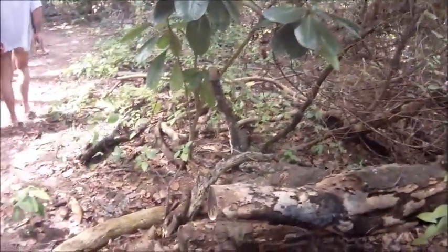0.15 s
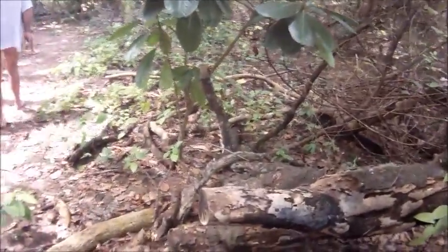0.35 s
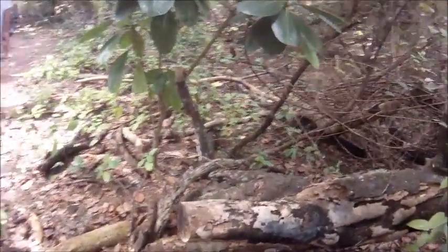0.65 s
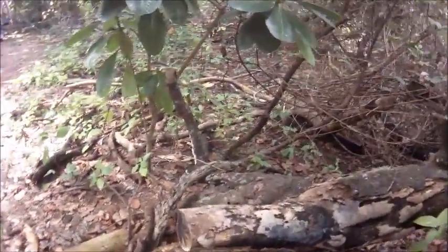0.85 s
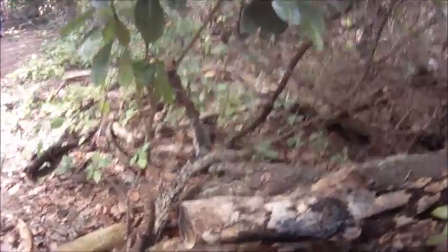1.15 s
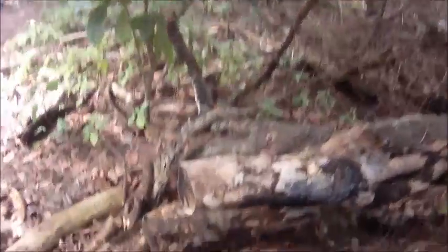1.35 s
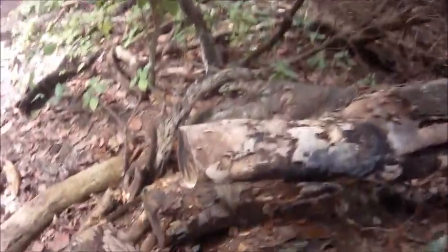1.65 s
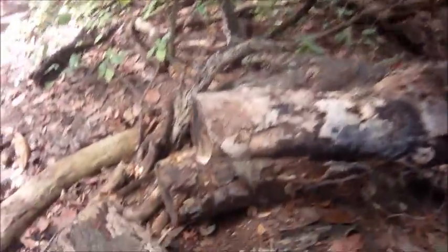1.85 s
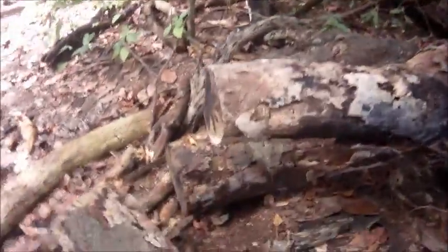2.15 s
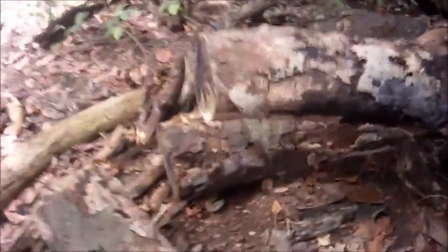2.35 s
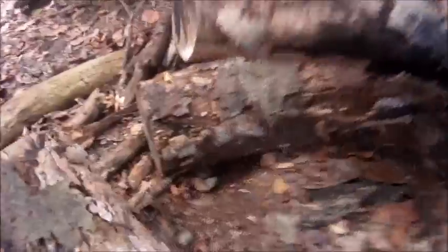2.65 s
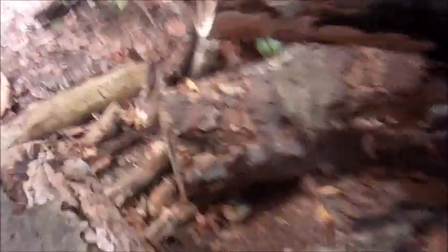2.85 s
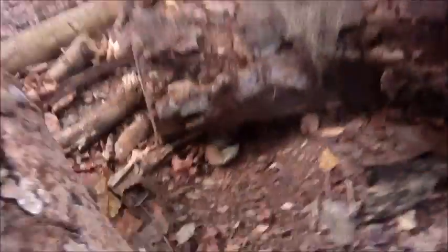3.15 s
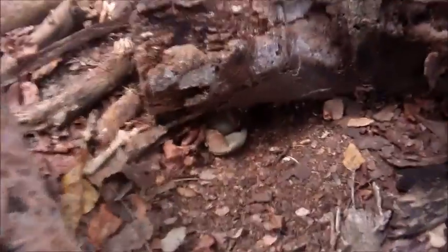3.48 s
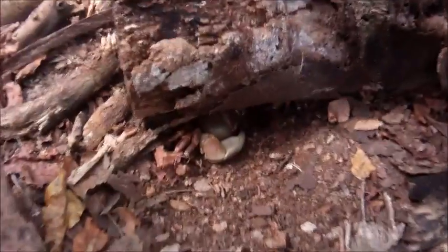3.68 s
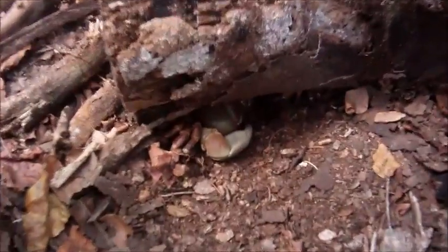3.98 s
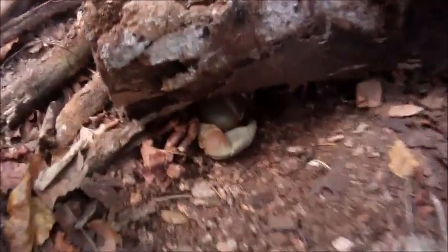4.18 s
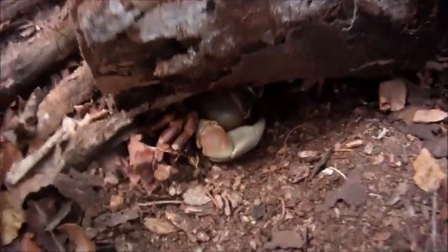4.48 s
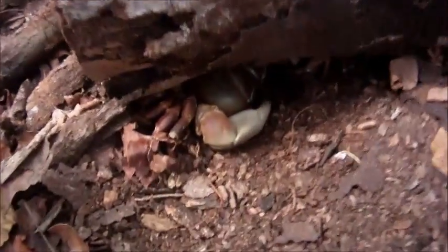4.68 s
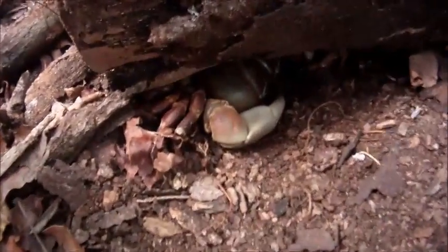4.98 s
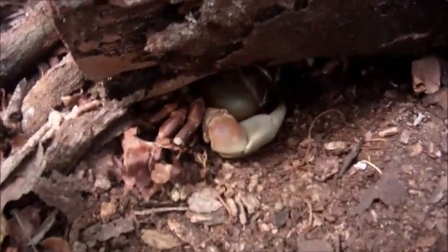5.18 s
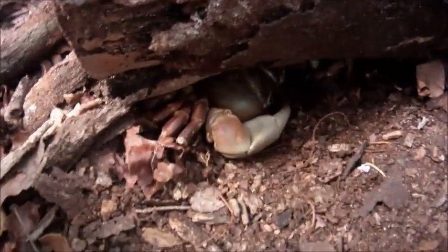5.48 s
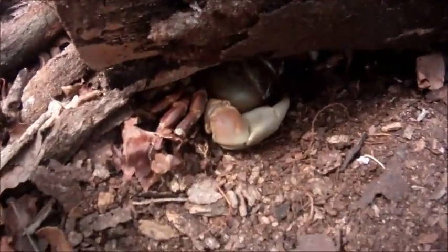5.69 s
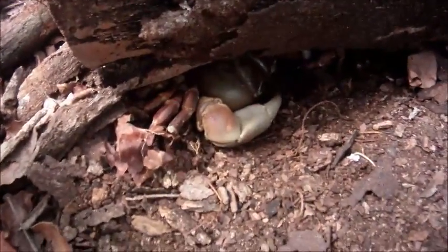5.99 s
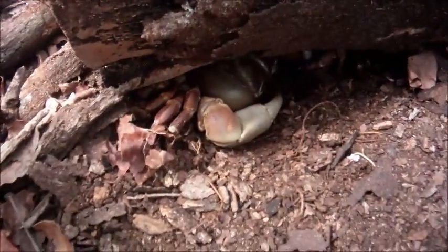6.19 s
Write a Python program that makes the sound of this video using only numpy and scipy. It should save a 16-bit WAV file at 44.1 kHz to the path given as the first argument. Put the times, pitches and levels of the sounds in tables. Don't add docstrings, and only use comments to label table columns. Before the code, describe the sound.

A quiet forest floor with faint hiss, thin electronic whine and two soft distant bird notes. Dry leaves rustle while a hand rubs and bumps the camera. Twig ticks thicken into crunching and scraping, then two violent snaps overload the microphone just after three seconds. After a lull, sticks clatter lightly, a stiff leaf creases in rapid clicks, and a few hollow taps fade into hiss. Close, dry, practically mono.

```python
import sys
import numpy as np
from scipy import signal
from scipy.fft import rfft, irfft
from scipy.io import wavfile
from scipy.ndimage import uniform_filter1d

SR = 44100
rng = np.random.default_rng(int(sys.argv[2]) if len(sys.argv) > 2 else 0)


def to_wav(sig):
    pcm = np.clip(np.atleast_2d(sig), -1, 1) * 32767
    pcm = np.round(pcm).astype(np.int16)
    wavfile.write(sys.argv[1], SR, pcm.T)


def gain_from_db(level_db):
    decades = np.asarray(level_db, float) / 20
    return 10 ** decades


N = 279153


def level(x, rms_db):
    return x * gain_from_db(rms_db) / np.sqrt(np.mean(x ** 2))


def peak(x, peak_db):
    return x * gain_from_db(peak_db) / np.abs(x).max()


def band(x, lo_hz, hi_hz, order=2):
    sos = signal.butter(order, [lo_hz, min(hi_hz, .47 * SR)], "band", fs=SR, output="sos")
    return signal.sosfilt(sos, x)


def ring(x, hz, t60_s):
    pole = np.exp(2j * np.pi * hz / SR - np.log(1000) / (t60_s * SR))
    return signal.lfilter([1], [1, -pole], x).imag


def ring_modes(x, modes):
    return sum(gain_from_db(gain_db) * ring(x, hz, t60_s) for hz, gain_db, t60_s in modes)


def add(out, sound, start_s):
    i = int(start_s * SR)
    out[i:i + len(sound)] += sound[:N - i]


def walk(rate_hz):
    hold = int(SR / rate_hz)
    steps = np.repeat(rng.standard_normal(N // 500), hold)[:N]
    slow = uniform_filter1d(uniform_filter1d(steps, hold), hold)
    return slow / slow.std()


def swells(rows):
    t = np.arange(0, N / SR, .001)
    loudest_s, swell_s, fade_s, level_db = np.transpose(rows)[:, :, None]
    drop = np.maximum((loudest_s - t) / np.abs(swell_s), (t - loudest_s) / np.abs(fade_s))
    power = gain_from_db(2 * (level_db - 20 * drop)).sum(axis=0)
    return np.interp(np.arange(N) / SR, t, np.sqrt(power))


def burst(noise, decay_ms, click):
    rattle = noise * np.exp(-np.arange(len(noise)) / SR / (decay_ms / 1000))
    return np.concatenate([[-click], rattle[1:]])


def grains(per_s, spread_db, tail_ms):
    struck = rng.random(N) < per_s / SR
    cracks = struck * gain_from_db(spread_db * np.minimum(rng.exponential(size=N), 4.5))
    tail = signal.lfilter([1], [1, -np.exp(-1000 / (tail_ms * SR))], cracks)
    return tail * rng.standard_normal(N)


# (frequency [Hz], density [dB/Hz])
HISS_SPECTRUM = [(71, -41.5), (120, -8), (839, -7.5), (1050, -7.5), (2240, -10.5), (3450, -4),
                 (4410, -12.5), (5080, -4), (5630, -11.5), (8140, -2), (9020, -15), (14700, -11.5),
                 (16000, -31)]


def forest_hiss():
    hz, density_db = np.transpose(HISS_SPECTRUM)
    bins_hz = np.fft.rfftfreq(N, 1 / SR)
    shape = gain_from_db(np.interp(np.log(bins_hz + 1), np.log(hz), density_db))
    hiss = irfft(rfft(rng.standard_normal(N)) * shape, N)
    return level(hiss, -67) * gain_from_db(0.77 * walk(7.5))


# (frequency [Hz], rms level [dB])
WHINE_LINES = [(3494, -95), (5156, -78.5), (5184, -75.5), (8360, -76)]


def electronics():
    t = np.arange(N) / SR
    whine = 0
    for hz, rms_db in WHINE_LINES:
        gain = gain_from_db(rms_db + 1 + 1.2 * walk(25))
        whine = whine + gain * np.sin(2 * np.pi * hz * t + .3 * walk(28))
    frame_hz = 60
    spikes = np.zeros(N)
    for rate_hz, height in [(2 * frame_hz, 1), (frame_hz, 0.45)]:
        spikes[(np.arange(int(t[-1] * rate_hz)) * SR / rate_hz).astype(int)] = height
    spikes = spikes * gain_from_db(2 * rng.standard_normal(N))
    buzz = ring(spikes, 7780, t60_s=0.0092) + .5 * ring(spikes, 5100, t60_s=0.0034)
    return whine + level(band(buzz, 6000, 8500, order=3), -74) * gain_from_db(2.2 * walk(11))


# (loudest [s], swell [s/20 dB], fade [s/20 dB], level [dB])
BIRD_NOTES = [
    (.36, .15, 0.3054, -93.5),
    (.49, 0.18, 0.083, -76.5),
    (.7, 0.256, 0.124, -76.5),
]


def bird():
    hz = 2104 * (1 + 0.01193 * walk(12))
    return np.sqrt(2) * swells(BIRD_NOTES) * np.sin(2 * np.pi * np.cumsum(hz) / SR)


# (time [s], shake level [dB], grip level rel. shake [dB])
HAND_MOTION = [(0.0, -74.5, 3), (.7, -71, 2), (.85, -67.5, 7), (1.1, -70, 12), (1.2, -71, -7.5),
               (1.55, -69.5, -1.5), (1.65, -62, 3), (1.85, -63.5, 2.5), (1.95, -61.5, -27.5),
               (2.9, -61.5, -18.5), (3.12, -57, 2), (3.24, -61, -8.5), (3.52, -65.5, -20.5),
               (4.99, -61.5, -32.5), (6.33, -73.5, 2.7)]


def hand():
    time_s, shake_db, grip_db = np.transpose(HAND_MOTION)
    t = np.arange(N) / SR
    shake = level(band(rng.standard_normal(N), 2.9, 29), 0)
    grip = level(band(grains(61, 3.0, tail_ms=7.2), 34, 110), 0)
    grip = gain_from_db(np.interp(t, time_s, grip_db) - 10.5) * grip
    return gain_from_db(np.interp(t, time_s, shake_db)) * (shake + grip)


# (time [s], peak [dB], contact [ms], direction [+-1])
HOUSING_BUMPS = [(.589, -50, 0.7007, -1), (0.658, -52.5, 0.98, 1), (.805, -50.5, 15.4, 1),
                 (0.829, -46, 0.456, -1), (0.887, -50.5, 11.7, -1), (1.565, -59.5, 4.7, -1),
                 (1.61, -52.5, 1.23, -1), (1.627, -53, 1.85, 1), (1.633, -54.5, 11.6, 1),
                 (1.889, -55.5, 7.3, -1), (2.19, -46, 1.75, 1), (2.5473, -35.5, 2.52, -1),
                 (3.123, -33, 6, -1), (3.339, -24.5, 15.65, 1)]


def bumps():
    out = np.zeros(N)
    t_ms = np.arange(3000) / SR * 1000
    for start_s, peak_db, contact_ms, direction in HOUSING_BUMPS:
        push = np.sin(np.pi * np.clip(t_ms / contact_ms, 0, 1)) ** 2
        rough = 1 + 0.96 * rng.standard_normal(len(push))
        add(out, peak(band(np.sign(direction) * push * rough, 42, 630, order=1), peak_db), start_s)
    return out


# (loudest [s], swell [s/20 dB], fade [s/20 dB], level [dB], pitch [Hz])
HOUSING_DRAGS = [(.96, 0.96, -0.06, -74, 1054), (1.251, -0.8, -0.53, -76, 3376),
                 (1.84, 0.06, 0.08, -66, 1199), (2.12, .1, .1, -62, 1150), (2.179, 0.1, 0.03, -57, 1600),
                 (2.316, 0.0649, 0.07, -49, 665), (2.34, 0.0821, 0.0454, -49, 666),
                 (2.336, 0.19, 0.2461, -60, 269.4), (2.808, 0.03, 0.04, -55, 1250),
                 (2.87, 0.06, 0.05, -53, 1250), (2.907, 0.05, 0.025, -43, 1239),
                 (2.97, 0.05, 0.08, -51, 1180), (3.045, 0.02, 0.08, -41, 1204),
                 (3.097, 0.0512, 0.02, -33, 1700), (3.056, 0.1729, 0.15, -52, 302),
                 (3.089, 0.0319, 0.0462, -34.5, 1165), (3.106, 0.0378, -0.0016, -23.5, 1164),
                 (3.225, 0.59, 0.0845, -58.5, 1659), (3.35, 0.24, -0.0351, -60, 1053),
                 (4.189, 0.47, 1.5, -70.5, 1098), (4.291, 0.012, 0.025, -52, 1900),
                 (4.306, .008, .025, -54, 1200), (4.328, 0.02, 0.06, -57, 900),
                 (4.403, 0.01, 0.04, -60, 1000), (4.359, 0.03, 0.04, -55, 1200),
                 (4.567, 0.1829, 0.2, -57, 805)]


def drags():
    slips = level(grains(1000, 2.7, tail_ms=1.5), 0) * gain_from_db(2.4 * walk(35))
    scrape = level(band(slips, 390, 3100), 0) * swells(np.array(HOUSING_DRAGS)[:, :4])
    tone = 0
    for *movement, hz in HOUSING_DRAGS:
        part = band(ring(slips, hz, t60_s=6 / hz), hz / 1.2, hz * 1.2)
        tone = tone + level(part, 0) * swells([movement])
    return gain_from_db(-4) * (scrape + gain_from_db(-2) * tone)


# (loudest [s], swell [s/20 dB], fade [s/20 dB], level [dB], low modes rel. [dB])
PALM_RUBS = [(1.974, .008, .04, -51, -8), (2.013, .02, .03, -56, -12), (2.028, .008, .04, -53, -12),
             (2.054, .01, .05, -50, -12), (2.078, .015, .03, -49, -10), (2.115, .02, .08, -49, -10),
             (2.132, .02, .05, -50, -10), (2.153, .015, .06, -46, -10), (2.164, .02, .04, -47, -8),
             (2.178, .03, .012, -48, -6), (2.63, .15, .15, -56, -12), (2.894, .012, .04, -38, 0),
             (2.905, .02, .03, -38, 0), (2.916, .03, .008, -39, -2), (3.041, .008, .04, -31, -3),
             (3.056, .02, .03, -31, 2), (3.076, .015, .04, -30, -4), (3.089, .005, .06, -25, 1),
             (3.105, .05, .012, -25, 1)]
# (frequency [Hz], gain [dB], t60 [s])
RUB_HIGH_MODES = [(4130, -5, .012), (5050, -12, .007), (6750, 0, .011), (7080, -3, .01)]
# (frequency [Hz], gain [dB], t60 [s])
RUB_LOW_MODES = [(1183, -2.5, 0.0202), (1590, -9, 0.0161), (2590, 0.5, 0.0158), (3317, -1, 0.018)]


def rubs():
    rows = np.array(PALM_RUBS)
    high_db = rows[:, 3]
    low_db = high_db + rows[:, 4]
    slips = level(grains(900, 3.0, tail_ms=.6), 0)
    out = 0
    for modes, level_db, lo_hz in [(RUB_HIGH_MODES, high_db, 3000), (RUB_LOW_MODES, low_db, 800)]:
        gain = swells(np.c_[rows[:, :3], level_db])
        norm = np.std(ring_modes(slips[:SR], modes))
        out = out + band(ring_modes(slips * gain, modes), lo_hz, 9000) / norm
    return out


# (time [s], drive [dB], tearing [ms], shell rel. [dB], treble rel. [dB])
HEAVY_SNAPS = [
    (3.1181, -11.5, 5.7, 2, -3),
    (3.1235, 5, 0.669, -7, -12),
    (3.1300, -11, 1.5, -11, -29.5),
    (3.3397, 13.5, 3.0, 0.5, -4.5),
    (3.353, -36.5, 2.35, -6.5, 0.5),
]
# (frequency [Hz], gain [dB], t60 [s])
HOUSING_MODES = [(306, -19, 0.016), (681.5, -13, 0.019), (1062.8, -7.5, 0.024), (1284, -4, 0.015),
                 (1515.9, -7.5, 0.012), (1888.6, -11.5, 0.012), (2090, -11, 0.016)]
# (frequency [Hz], gain [dB], t60 [s])
SHELL_MODES = [(2600, -9, .008), (2950, -6, .007), (3260, -1, .009), (3930, -3, .006), (5490, -7, .005),
               (6500, -6, .004), (7580, -11, .004)]


def snaps():
    out, hollow = np.zeros(N), np.zeros(N)
    t_ms = np.arange(6000) / SR * 1000
    for start_s, drive_db, tearing_ms, shell_db, treble_db in HEAVY_SNAPS:
        noise = rng.standard_normal(6000)
        push = np.r_[-np.full(4, 2.5), noise[4:]] * np.exp(-(t_ms / tearing_ms) ** 3)
        body = peak(ring_modes(push, HOUSING_MODES), 0)
        shell = peak(ring_modes(push, SHELL_MODES), shell_db)
        treble = peak(band(push, 4200, 9400, order=1), treble_db)
        add(out, peak(body + shell + treble, drive_db), start_s)
        log_answer = ring(push, 570, t60_s=0.16)
        debris = band(burst(noise[::-1], decay_ms=5, click=0), 1500, 14000, order=1)
        add(hollow, peak(log_answer, drive_db - 57), start_s)
        add(hollow, peak(debris, drive_db - 48), start_s)
    flat = np.tanh(out / 0.89) * 1.7
    flat = signal.lfilter(*signal.iirnotch(770, 1.6, fs=SR), flat)
    sagged = signal.lfilter(*signal.butter(1, 900, "high", fs=SR), band(flat, 260, 22000))
    return sagged + hollow


# (time [s], peak [dB], pitch [Hz])
BRITTLE_TICKS = [(0.6037, -44, 7440), (0.6976, -45, 6760), (.7733, -43.5, 6550), (1.1026, -48, 7100),
                 (1.468, -56, 7000), (1.9395, -52, 6740), (1.973, -40.5, 6570), (1.9794, -48.5, 6800),
                 (2.0264, -53, 6925), (2.0785, -37, 6800), (2.1626, -41, 6900), (2.239, -44, 2560),
                 (2.3601, -34, 8520), (2.3744, -35.5, 4922), (2.3919, -38, 6230), (2.4252, -38, 5038),
                 (2.432, -32, 6710), (2.4715, -45, 3312), (2.4786, -35.5, 5930), (2.8071, -32, 6800),
                 (2.8542, -34.5, 7020), (2.8788, -23.5, 5150), (2.9416, -39, 4747), (2.985, -36, 6520),
                 (2.8922, -28, 6500), (2.9055, -26, 6600), (2.9165, -31.5, 7230), (3.0395, -21, 2600),
                 (3.043, -24, 5270), (3.057, -23, 2500), (3.5109, -45.5, 6700), (3.553, -48.5, 7020),
                 (3.625, -46.5, 7620), (4.2105, -45.5, 3670), (4.374, -45.5, 6522), (4.439, -36, 5010)]
# (time [s], crack peak [dB], pitch [Hz], knock rel. [dB])
TWIG_KNOCKS = [(0.5913, -51, 3920, -8), (0.8288, -41, 6640, -8.5), (1.6287, -61.5, 5140, 6),
               (1.6793, -42, 5150, -14), (1.8425, -42.5, 5159, -8.5), (2.1908, -32, 5200, -6),
               (2.271, -42, 4452, -1), (2.2753, -37.5, 3370, 7.5), (2.28, -40, 5016, 0.5),
               (2.285, -54, 3000, -6), (2.3533, -35, 5070, -21), (2.3129, -41, 3390, -1.5),
               (2.3407, -28.5, 4990, -10), (2.409, -44, 4834, -18.5), (2.5472, -28.5, 4800, -5),
               (2.5514, -31.5, 7286, -5), (2.6826, -48, 6566, 0), (2.9454, -27.5, 6130, -11),
               (3.0871, -8.5, 2578, -4.5), (3.2133, -42.5, 2000, -3), (4.1888, -43.5, 4945, -11),
               (4.273, -57.5, 2508, 3), (4.2782, -47, 6440, -0.5), (4.2851, -24.5, 5960, -11),
                (4.2888, -34, 2066, -15.5), (4.3014, -28, 6670, -5.5), (4.3152, -42.5, 6771, 2),
                (4.3242, -49.5, 2070, 9.5), (4.3321, -50.5, 3003, 6.5), (4.337, -60.5, 2494, 3),
                (4.35, -51.5, 6500, 2), (4.366, -62.5, 2199, 5.5), (4.385, -54, 3900, -2.5),
                (4.3533, -39, 5036, -1), (4.3581, -45.5, 3900, 6.5), (4.3981, -43, 3347, 5),
                (4.4481, -46.5, 7698, -2), (4.5115, -42.5, 5074, -12.5), (4.5411, -49, 2319, 2.5),
                (4.553, -35, 6190, -3), (4.5639, -48, 5990, 9), (4.5681, -39.5, 6672, -1.5),
                (4.572, -45.5, 4510, -12.5), (4.5864, -46.5, 2018, -6.5), (4.6, -41, 4677, -4.5),
                (4.6101, -54, 6474, -8.5), (4.625, -44.5, 4600, -13), (4.6725, -41.5, 2159, 2.5),
                (4.6879, -46, 2363, 0.5), (4.753, -31, 5074, -8.5)]
# (time [s], crack peak [dB], pitch [Hz], knock rel. [dB])
STICK_TAPS = [(4.9376, -47.5, 4931, -1.5), (4.9839, -36.5, 2102, -1), (5.0415, -48.5, 3483, -13),
              (5.0513, -42.5, 7400, 4), (5.1572, -37.5, 6135, 1.42), (5.262, -43, 6550, 0.5),
              (5.3822, -34.5, 6666, -4), (5.413, -34, 6743, -7.5), (5.4361, -47, 2090, 1.5)]
# (frequency [Hz], gain [dB], t60 [s])
KNOCK_MODES = [(326.8, -8.5, 0.061), (559.85, -32.5, 0.0153), (762.59, -3, 0.02618), (1188, 9, 0.0072),
               (1544, 3.5, 0.0086)]
# (frequency [Hz], gain [dB], t60 [s])
HOLLOW_MODES = [(332.1, -11.5, 0.0404), (629, -40, 0.0206), (829.6, 2, 0.032), (1139, 2, 0.0168),
                (1294.3, -3.5, 0.01185), (1522, -1.5, 0.0137), (1974.9, -6, 0.0135)]


def ticks():
    out = np.zeros(N)
    breaks = [(*row, -22, -25, KNOCK_MODES) for row in BRITTLE_TICKS]
    breaks += [(*row, -29, KNOCK_MODES) for row in TWIG_KNOCKS]
    breaks += [(*row, -29, HOLLOW_MODES) for row in STICK_TAPS]
    for start_s, peak_db, pitch_hz, knock_db, top_db, modes in breaks:
        crack_noise, push_noise, gain_noise, pitch_noise = rng.standard_normal((4, 1800))
        crack = burst(crack_noise, decay_ms=1.2, click=2.2)
        bright = peak(band(crack, 1973, 7940, order=5), -1.2)
        bright = bright + peak(band(ring(crack, pitch_hz, t60_s=0.00717), 2100, 11000), -5)
        push = burst(push_noise, decay_ms=0.616, click=3.92)
        varied = [(hz * (1 + 0.02206 * d), gain_db + 1.8 * c, t60_s)
                  for (hz, gain_db, t60_s), c, d in zip(modes, gain_noise, pitch_noise)]
        knock = band(ring_modes(push, varied), 310.4, 3400, order=3)
        top = band(burst(crack_noise, decay_ms=.5, click=3), 7500, 18030)
        add(out, peak(bright, peak_db), start_s)
        add(out, peak(knock, peak_db + knock_db), start_s)
        add(out, peak(top, peak_db + top_db), start_s)
    return out


# (time [s], peak [dB], top rel. [dB])
LEAF_CREASES = [(4.6482, -30.5, -9), (4.6634, -35, -11), (4.7148, -33, -8), (4.725, -36.5, -14.5),
                (4.727, -36.5, -13), (4.748, -39, -6.5), (4.7652, -31, -12.5), (4.78, -40, -16.5),
                (4.7832, -39, -21.5), (4.7943, -31, -8), (4.8167, -30.5, -7), (4.8267, -31.5, -12.5),
                (4.8315, -37.5, -17.5), (4.841, -34.5, -23.5), (4.859, -35, -15.5), (4.8736, -37, -13),
                (4.9105, -29, -6.5), (4.924, -38.5, -16), (4.9286, -43.5, -20), (4.9389, -34.5, -10),
                (4.9606, -48.5, -19), (4.9729, -35.5, -13.5)]
# (frequency [Hz], gain [dB], t60 [s])
BLADE_MODES = [(2690, -4.5, 0.0056), (3900, -5, 0.0066), (4890, 0.5, 0.00677), (6007, -10, 0.0108)]
# (frequency [Hz], gain [dB], t60 [s])
BLADE_TOP_MODES = [(8550, 7.5, 0.00258), (11900, -6.5, 0.0032), (15040, -19, 0.002694)]


def creases():
    out = np.zeros(N)
    for start_s, peak_db, top_db in LEAF_CREASES:
        push_noise, mode_noise = rng.standard_normal((2, 900))
        push = burst(push_noise, decay_ms=0.55, click=10.04)
        varied = [(hz * (1 + 0.0298 * d), gain_db + 2.95 * c, t60_s)
                  for (hz, gain_db, t60_s), c, d in zip(BLADE_MODES, mode_noise, mode_noise[::-1])]
        blade = band(ring_modes(push, varied) + gain_from_db(6.5) * push, 2413, 6120, order=3)
        top = band(ring_modes(push, BLADE_TOP_MODES), 8100, 18240)
        add(out, peak(blade, peak_db + 0.5), start_s)
        add(out, peak(top, peak_db + top_db + 5.5), start_s)
    return out


# (loudest [s], swell [s/20 dB], fade [s/20 dB], level [dB], leaf size [0-1])
SQUASHED_LEAVES = [(2.316, 0.0112, 0.062, -45.5, 0.95), (2.806, 0.071, 0.101, -42.5, 0.174),
                   (2.88, 0.0044, 0.0175, -31.5, 0.36), (2.895, 0.037, 0.0244, -33.5, 0.49),
                   (2.856, 0.0065, 0.083, -41.5, 0.27), (2.947, 0.00693, 0.11, -40.5, .6),
                   (2.989, 0.086, 0.133, -38.5, 0.606)]
# (loudest [s], swell [s/20 dB], fade [s/20 dB], level [dB], leaf size [0-1])
BRUSHED_LEAVES = [(.46, 0.5558, 0.29, -58.5, 0.56), (.75, 0.5, 0.5, -66, 0.67),
                  (1.21, 0.1153, 0.4146, -61, 0.66), (1.8, 0.55, 0.48, -60.5, 0.67),
                  (1.976, 0.1069, -0.07, -59.5, 0), (2.078, 0.2648, 0.48, -55.5, 0.28),
                  (2.118, -0.0022, 0.21, -54, 0.42), (2.225, -0.17, 0.09, -60.5, 0.75),
                  (2.268, 0.0142, -0.1436, -48.5, 0.62), (2.4, 0.13, 0.37, -59, 0.98),
                  (2.54, 0.3, -0.73, -53, 0.49), (2.63, 0.17, 0.51, -53.5, 0.34),
                  (3.03, -0.02, 0.0409, -33, 0.49), (3.042, -0.0191, 0.0151, -33, 0.49),
                  (3.058, -0.0277, -0.0043, -28.5, 0.96), (3.076, 0.0007, -0.0049, -27, 0.63),
                  (3.09, -0.0122, 0.0054, -24.5, 1), (3.225, -1.07, 0.3235, -58, 0.7),
                  (3.87, 0.4, 0.22, -62.5, 0.38), (4.3, 0.7056, 0.6, -63, 0.57),
                  (4.57, 0.2428, -0.03, -63, 0.46), (4.62, 0.06, 0.12, -59, 0.7),
                  (4.68, 0.0723, 0.036, -57, 1), (4.75, 0.45, 0.25, -58, 0.68),
                  (4.85, -0.44, 0.38, -67, 0.84)]
# (stop [s], swell [s/20 dB], level [dB], leaf size [0-1])
HALTED_BRUSHES = [(2.178, 0.0909, -48, 0.43), (2.193, -0.11, -56, 0.82), (2.285, -0.0171, -46, 0.94),
                  (2.345, 0.0955, -44.5, 0.46), (2.912, 0.0143, -39, 1), (3.105, 0.0313, -24, 0.85)]
# (frequency [Hz], width [Hz], gain [dB])
LEAF_RESONANCES = [(1180, 130, -4.5), (649.1, 250, -12), (2560, 380, -3), (3418, 210, -3.5),
                   (3900, 130, -0.5), (4850, 810, -10), (6685, 700, -2)]


def rustle():
    halted = [(stop_s, swell_s, .012, level_db, size) for stop_s, swell_s, level_db, size in HALTED_BRUSHES]
    stir = (0, 1e3, 1e3, -74.5, 0.46)
    leaves = np.array(SQUASHED_LEAVES + BRUSHED_LEAVES + halted + [stir])
    movement, level_db, size = leaves[:, :3], leaves[:, 3], leaves[:, 4]
    top_db = np.where(np.arange(len(leaves)) < len(SQUASHED_LEAVES), -17.5, -13)
    top = swells(np.c_[movement, level_db + top_db])
    crisp = swells(leaves[:, :4])
    mid = swells(np.c_[movement, level_db - 18 + 21 * size])
    body = gain_from_db(-23.5) * crisp
    shared = level(grains(700, 2.6, tail_ms=1.2), -1.5) * gain_from_db(1.3 * walk(40))
    bands = [(4260, 7700, crisp), (2000, 6500, mid), (523.5, 1600, body), (7900.3, 12000, top)]
    out = 0
    for lo_hz, hi_hz, gain in bands:
        cracks = shared + level(grains(1800, 2.4, tail_ms=1.5), 0) * gain_from_db(1.2 * walk(25))
        mix = level(band(cracks, lo_hz, hi_hz), 0)
        inside = [row for row in LEAF_RESONANCES if lo_hz < row[0] < hi_hz]
        if inside:
            tones = sum(gain_from_db(gain_db) * np.sqrt(width_hz) * ring(cracks, hz, 1.1 / width_hz)
                        for hz, width_hz, gain_db in inside)
            mix = mix + level(band(tones, lo_hz, hi_hz), 10)
        out = out + level(mix, 0) * gain
    return out


def scene():
    mono = rustle() + ticks() + creases() + bumps() + snaps()
    mono = mono + forest_hiss() + electronics() + hand() + drags() + bird() + rubs()
    overload = mono - np.clip(mono, -.45, .45)
    side = level(band(rng.standard_normal(N), 330, 16000), -78)
    side = side + gain_from_db(-24) * band(overload, 600, 6000, order=1)
    side = side + gain_from_db(-25) * band(overload, 8000, 16000)
    return mono + side * np.array([[1], [-1]])


def band_limit(x):
    return signal.sosfilt(signal.butter(12, 16310, fs=SR, output="sos"), x)


def record(dry):
    mid = dry.mean(axis=0)
    top_cut = signal.ellip(6, .2, 50, 15300, fs=SR, output="sos")
    clipped = np.clip(signal.sosfilt(top_cut, np.clip(mid, -1, 1)), -1, 1)
    mix = clipped + signal.sosfilt(top_cut, dry - mid)
    return band_limit(mix)


dry = scene()
out = record(dry)
to_wav(out)
```